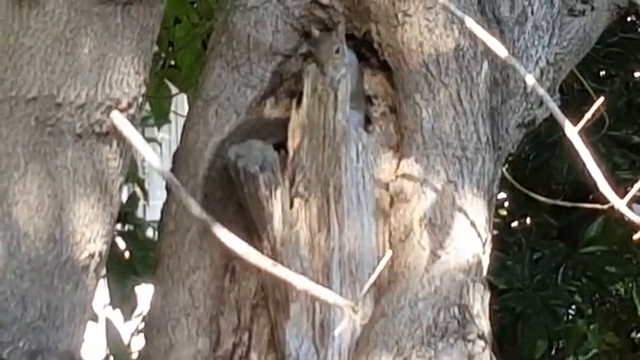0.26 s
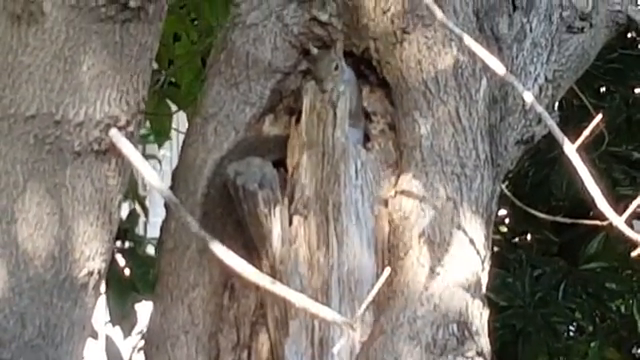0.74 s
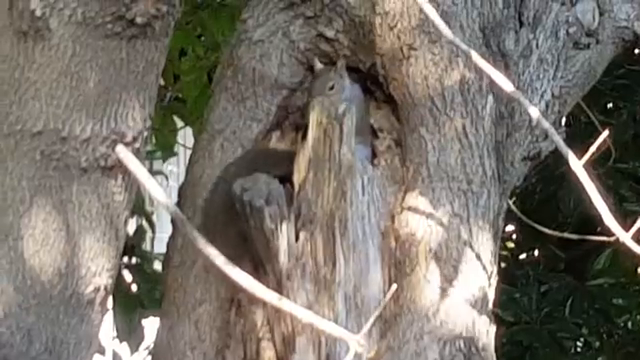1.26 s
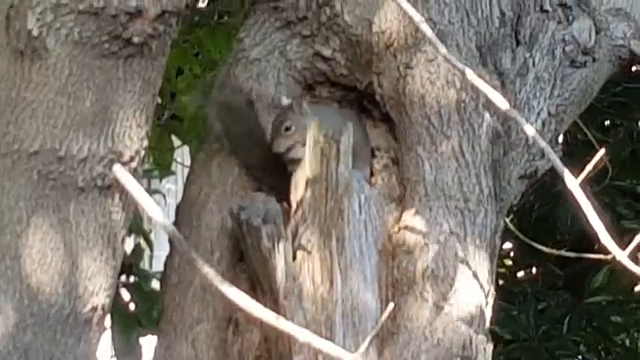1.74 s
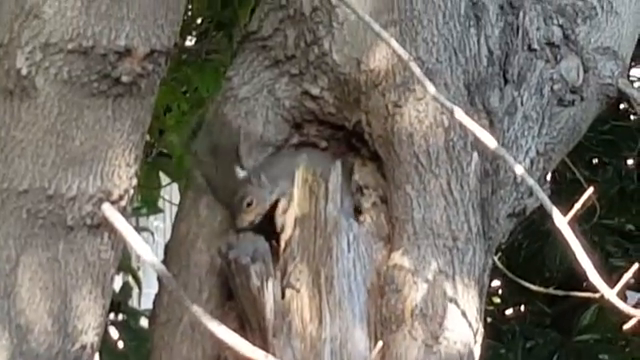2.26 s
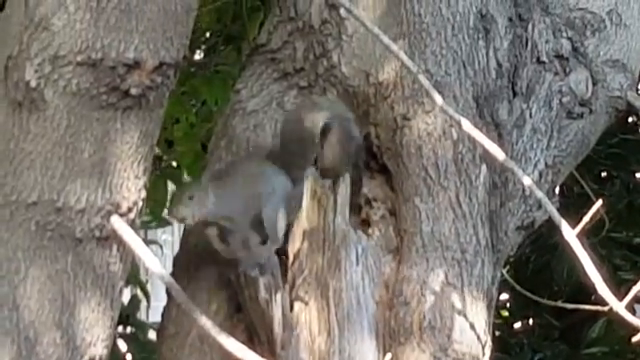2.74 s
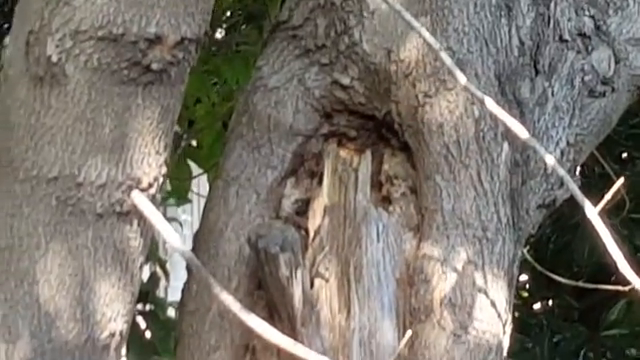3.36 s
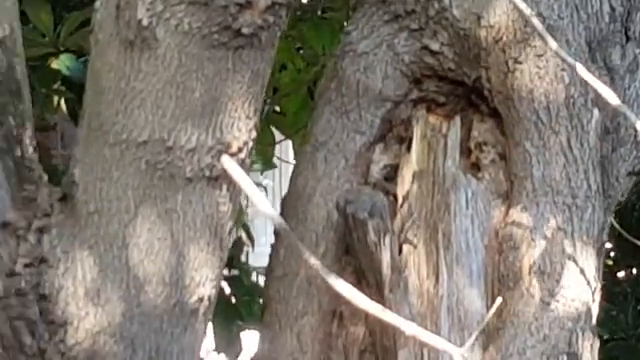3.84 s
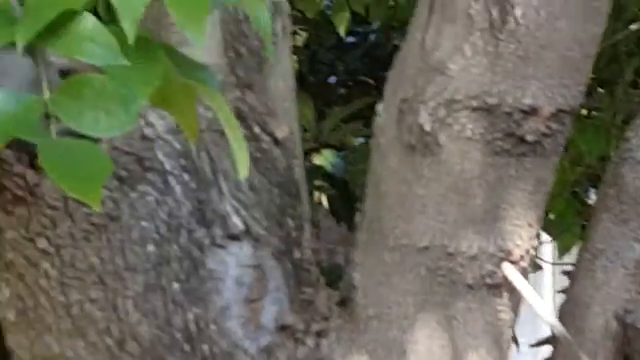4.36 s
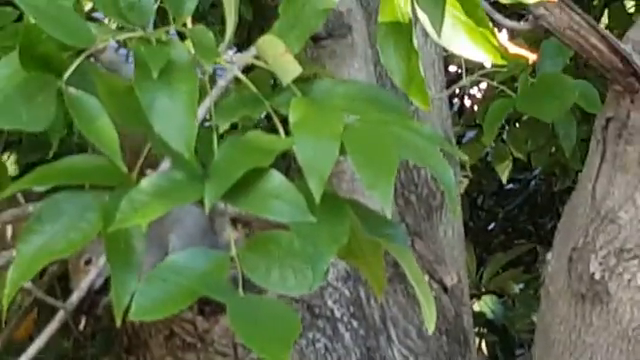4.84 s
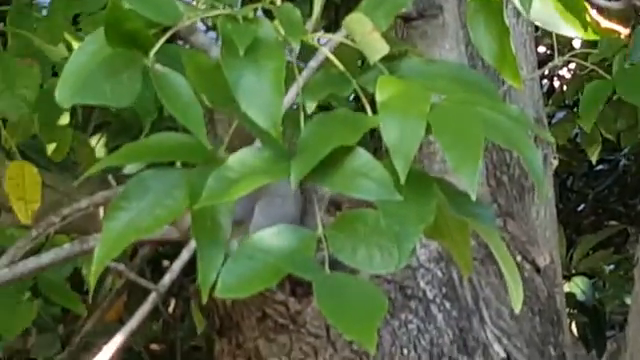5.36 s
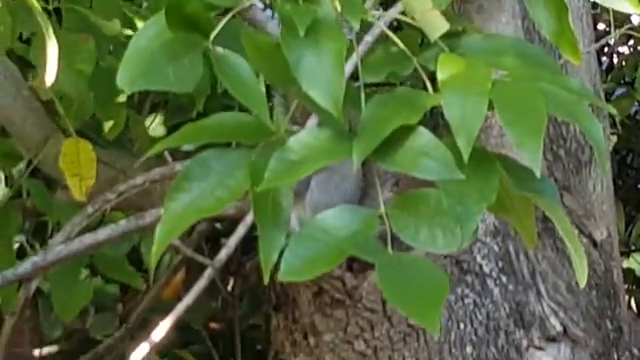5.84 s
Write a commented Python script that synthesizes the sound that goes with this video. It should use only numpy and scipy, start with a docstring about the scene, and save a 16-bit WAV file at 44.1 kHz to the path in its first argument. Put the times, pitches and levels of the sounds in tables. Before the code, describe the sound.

A hoarse squirrel repeats dry, scratchy barks, each under a tenth of a second or so, unevenly spaced at first, then more regular, with a tight cluster past the middle. Trunks and leaves scatter each bark into a short diffuse tail. Far below, town rumble, electric hum and a far engine that idles and later pulls away twice remain quiet, with a faint thin tone early on. Open-air stereo pickup.

```python
"""In the trees above a town, a squirrel gives a run of short hoarse barks.
Each bark is unsteady pulses and breath noise shaped by resonances of chest, mouth, throat and nose;
trunks and leaves, made as fading noise echoes, scatter it into a brief tail.
Behind it, sines make a far engine that idles away, then speeds up in two pulls, a brief thin tone
and a mains hum; bands of flickering noise make the rumble of the town."""
import sys
import numpy as np
from scipy import signal
from scipy.fft import rfft, irfft, next_fast_len
from scipy.io import wavfile
from scipy.ndimage import uniform_filter1d

SR = 44100
rng = np.random.default_rng(int(sys.argv[2]) if len(sys.argv) > 2 else 0)


def to_wav(sig):
    """Store sig (one row per channel, or 1-D mono) as 16-bit WAV at the path in sys.argv[1].

    Samples outside -1..1 are clipped; the rate is SR.
    """
    pcm = np.clip(np.atleast_2d(sig), -1, 1) * 32767
    pcm = np.round(pcm).astype(np.int16)
    wavfile.write(sys.argv[1], SR, pcm.T)  # frames by channels


N = 269284   # samples in the scene

# The barks, one per row; levels from chest to rasp, and the core, count from the whistle band:
# t/s, length/s, pitch f/Hz, roughness (1 or more = all breath), whistle band level/dB,
# chest level/dB, mouth f/Hz, throat level/dB, nose level/dB, upper resonances level/dB,
# rasp level/dB, mouth rise over the bark/dB, throat rise/dB, whistle core level/dB
BARK_ROWS = [(0.035, 0.043, 1004, 1.2, -56, 0.5, 1690, -3, -2, 1.5, -9, 0.5, 8, -11),
             (0.194, 0.047, 973, 0.9, -52.5, 2.5, 1800, -6, -5, 0, -11, -6, -4, -8),
             (0.509, 0.082, 870, 0.58, -52.5, 2.5, 1700, -5.5, -6, 1, -6.5, 3, -1.5, -8),
             (1.159, 0.11, 589, 0.42, -52.5, -2.5, 1790, -4, -2.5, 0.5, -4.5, 4, 2, -5.5),
             (1.537, 0.063, 836, 0.98, -51.5, 2.5, 1770, -4, -3, 3, -6.5, -2, -5, -11),
             (1.827, 0.069, 855, 0.94, -51.5, 3.5, 1770, -2.5, -4.5, 0.5, -2, -3, -5, -12),
             (2.158, 0.069, 812.5, 0.41, -53.5, 2.5, 1460, 0.5, -2.5, 1.5, -0.5, 1, -6, -9),
             (2.436, 0.057, 742.6, 0.46, -50, 0, 1320, -2, -4.5, -0.5, -2, -5, -4, -12),
             (2.698, 0.067, 1007, 1.14, -48, -4, 1310, -1.5, -6.5, -1, -6, 3, -9, -4),
             (3.223, 0.071, 773, 0.84, -56, 1, 1300, -1.5, -4, -1, -2.5, -4, 2, -10),
             (3.505, 0.072, 810.5, 0.29, -53, 1, 1680, 5.5, -1, 2, 3.5, 10, -15, -11),
             (3.739, 0.061, 777, 0.99, -51, 3, 1300, 0.5, -2.5, -1, -1, 3, -11, -10),
             (3.872, 0.054, 778, 1, -50.5, 4, 1430, 0, -4.5, -1, 1, 1, -2, -7),
             (4.036, 0.051, 787, 0.96, -51.5, 6.5, 1370, -3, -1.5, 2, 3.5, 0.5, -1.5, -12),
             (4.222, 0.062, 786, 0.93, -50.5, 4, 1510, -2.5, -5, 1, 0.5, 1, -9, -13),
             (4.420, 0.058, 818, 0.7, -51, 6.5, 1670, 0, -3, 1.5, 1, -6, -10, -13),
             (4.683, 0.07, 807, 0.85, -50, 5.5, 1630, -1.5, -3.5, 1.5, -1, 1, -5, -13),
             (5.045, 0.072, 819, 0.74, -49, 5, 1600, -8.5, -7, -0.5, -1, 11, -1.5, -10),
             (5.28, 0.054, 786, 0.77, -49.5, 3, 1690, -7, -1.5, 1, -1, 4, -1.5, -11),
             (5.495, 0.059, 791, 0.22, -49, 2.5, 1730, -8.5, -5, -2.5, -3.5, 10, -1.5, -12),
             (5.845, 0.057, 812, 1.06, -46, 0, 1720, -11, -7, -3, -10, 12, -6, -12)]
# How the voice changes as the head turns (a dip above 0 dB counts as none):
# t/s, chest f/Hz, mouth level against chest/dB, nose f/Hz, throat f/Hz, whistle band f/Hz,
# rasp f/Hz, lower dip f/Hz, its level/dB, upper dip f/Hz, its level/dB,
# top resonance level/dB, bridge resonance level/dB, left against right level/dB
HEAD_TURNS = [(0, 1090, -6, 2090, 3300, 7960, 12400, 4530, -6, 6000, -3, -8, -14, -1.5),
              (0.6, 1050, -3, 1990, 3300, 7700, 12300, 4650, -8, 5900, -8, -5, -18, -1),
              (1.2, 1090, 0, 2450, 3580, 7440, 11600, 4530, -6, 5900, -16, -14, -4, -1),
              (1.55, 1070, -1, 2600, 3300, 7800, 11300, 4540, -13, 5700, -12, -12, -12, -1.5),
              (1.85, 1010, -4, 2590, 3260, 7340, 11100, 4540, -7, 5800, -8, -13, -2, 0),
              (2.2, 1010, 3, 2200, 3080, 7400, 11200, 4500, -5, 5800, -8, -12, -14, -1),
              (2.45, 960, 2, 2200, 3070, 7540, 10900, 5100, -8, 5800, 4, -12, -24, -1),
              (2.7, 775, 2, 2760, 3170, 7270, 10600, 4700, -3, 5640, -4, -18, -22, -1.5),
              (3.5, 780, 1.5, 2120, 3230, 7180, 10600, 5100, 0, 5700, -0.5, -11, -24, -0.5),
              (4.0, 750, -7, 2190, 3150, 7140, 10550, 4840, 1, 5700, -7, -18, -18, -1),
              (4.7, 750, -3.5, 2480, 3260, 7350, 10700, 4700, -3, 5550, -6, -12, -17, -1),
              (5.15, 920, -10, 2470, 3400, 7300, 10700, 4770, -7, 5700, -8, -15, -18, 0),
              (5.5, 750, -8, 2330, 3400, 7770, 11400, 4800, 1, 5700, -1.5, -8, -23, -1.5),
              (6.1, 840, -9, 2360, 3200, 7300, 10600, 4800, 1, 5800, -10, -22, -18, 0.3)]
# Echoes from near trunks: level against the direct sound/dB, time to fall 60 dB/s
NEAR_TRUNKS = (6.5, .036)
# Echoes from far foliage, same columns
FAR_FOLIAGE = (1, 0.34)
# The far engine, one list per stretch: t/s, firing f/Hz, level/dB
ENGINE_STRETCHES = [
    [(0, 77.4, -49), (0.5, 82.2, -48.5), (0.9, 76, -48)],
    [(1.8, 101, -59), (2.5, 102, -46.5), (3.3, 102.6, -46), (4.0, 106.4, -44), (4.4, 113.7, -49.5),
     (4.75, 115.3, -50), (4.9, 126, -74)],
    [(4.4, 76.7, -81), (4.8, 79.8, -46.5), (5.2, 85, -45), (5.6, 92.4, -41.5), (6.1, 101, -47.5)],
]
# The brief thin tone: t/s, f/Hz, level/dB
THIN_TONE_ROWS = [(0.45, 399.5, -68), (0.55, 399.5, -59), (0.85, 399.5, -58), (0.92, 399.5, -53.5),
                  (1.2, 399.5, -52.5), (1.6, 399.5, -54), (1.66, 399.5, -75)]
# Colour of the town rumble: f/Hz, relative level per Hz/dB
TOWN_COLOUR = [(12, -67), (20, -53), (49, -15), (83, -10), (103, -6), (122, -7), (185, -12.5), (245, -13),
               (405, -16.5), (565, -25), (615, -23), (835, -20.5), (1100, -27.5), (1380, -29.5),
               (7130, -48.5), (15500, -58)]
# Loudness of the town rumble: t/s, level/dB
TOWN_LOUDNESS = [(0, -44), (2.4, -42.5), (3.6, -41.5), (5.3, -41), (6.1, -41.5)]
# How alike the rumble is at the two microphones: f/Hz, likeness (-1 opposite, 0 unrelated, 1 same)
TOWN_LIKENESS = [(60, 1), (130, 0.92), (290, 0.93), (640, 0.5), (1300, -0.19), (3000, 0.053),
                 (15000, 0.078)]
# Colour of the left microphone against the right: f/Hz, level/dB
MICROPHONE_COLOUR = [(300, 0.5), (800, 1), (1600, 1.5), (3000, 0.5), (5500, -1), (7500, 0.5), (9500, 3),
                     (11000, -0.5), (12500, -3.5), (15000, 0)]

# Resonances of the voice
LOW_WIDTH_HZ, MIDDLE_WIDTH_HZ, WHISTLE_WIDTH_HZ, RASP_WIDTH_HZ = 270, 310, 1960, 4100
CORE_WIDTH_HZ, DIP_WIDTH_HZ = 240, 550   # narrow core of the whistle band; dips cut by side cavities
BRIDGE_HZ, BRIDGE_WIDTH_HZ = 5210, 320   # narrow resonance between the two dips
UPPER, BETWEEN = (3990, 680, -4.5), (5170, 1330, -3.5)   # f/Hz, width/Hz, level/dB
TOP = (13340, 590)   # f/Hz, width/Hz
SKIRT_DB = 5   # broad skirt against the narrow peak of a resonance
MOUTH_DB_PER_KHZ = -8   # the mouth resonance weakens as it rises past 1500 Hz
SWELL_DB = 4   # rise of the treble over one bark
STEADY_S = .015   # a resonance holds its level over spans longer than this
GLIDE = .06   # resonances climb by this share of their pitch over one bark, as the mouth opens
# Echoes
FOLIAGE_DULL_HZ = 10000   # far foliage dulls its echoes above this
ECHOES_ALIKE_HZ = 800   # below this the echoes reach both microphones alike
EVEN_HZ, TREND_HZ = 140, 5000   # echoes favour no band wider than the first; the broad colour stays
LEAD = 256   # lead-in of the echo paths, in samples
# Background and microphones
HUM_HZ, HUM_DB = 120.74, -44.5
BAND_HZ, BAND_START_DB, BAND_DB_PER_S = 417, 2, -1   # a band of the rumble fades slowly
CUTOFF_HZ = 15800   # nearly silent from here up


def squirrel():
    """Every bark takes new paths through the trees, as the animal turns and moves."""
    out = np.zeros((2, N + SR))
    turn_s, *turns = np.transpose(HEAD_TURNS)
    for start_s, *voice in BARK_ROWS:
        *pose, pan_db = [np.interp(start_s, turn_s, column) for column in turns]
        one_bark = bark(*voice, *pose)
        heard = signal.fftconvolve(one_bark[None], trees())
        heard = heard * from_db([[pan_db / 2], [-pan_db / 2]])
        first = round(start_s * SR) - LEAD
        out[:, first:first + heard.shape[1]] += heard
    return out[:, :N]


def bark(length, pitch_hz, rough, db, chest_db, mouth_hz, throat_db, nose_db, upper_db, rasp_db,
         mouth_rise_db, throat_rise_db, core_db, chest_hz, mouth_db, nose_hz, throat_hz, whistle_hz,
         rasp_hz, low_dip_hz, low_dip_db, high_dip_hz, high_dip_db, top_db, bridge_db):
    """One bark: the lows burst out at once, the treble swells and arches later, all end quickly."""
    count = 8192
    t = np.arange(count) / SR
    progress = np.minimum(t / length, 1) - .5   # from -0.5 at the start to 0.5 at the end
    source = vocal_folds(count, pitch_hz, rough)
    clumps_db = 1.3 * drift(90, count=count)   # effort comes in clumps

    # chest and mouth
    mouth_db = chest_db + mouth_db + MOUTH_DB_PER_KHZ * (mouth_hz - 1500) / 1000
    mouth = formant(source, mouth_hz, LOW_WIDTH_HZ, mouth_db + mouth_rise_db * progress, progress)
    chest = formant(source, chest_hz, LOW_WIDTH_HZ, chest_db, progress)
    lows = chest - mouth

    # nose and throat
    throat_db = throat_db + throat_rise_db * progress
    throat = formant(source, throat_hz, MIDDLE_WIDTH_HZ, throat_db, progress)
    nose = formant(source, nose_hz, MIDDLE_WIDTH_HZ, nose_db - 0.9 * progress, progress)
    middle = nose - throat

    # upper resonances and the bridge
    upper = formant(source, *UPPER, progress) - formant(source, *BETWEEN, progress)
    upper = from_db(upper_db - 2.5 * progress) * upper
    bridge = from_db(bridge_db) * steady(resonate(source, BRIDGE_HZ, BRIDGE_WIDTH_HZ))

    # whistle band and rasp
    swell = from_db(SWELL_DB * progress)
    core = from_db(core_db) * steady(climbing(source, whistle_hz, CORE_WIDTH_HZ, progress))
    whistle = formant(source, whistle_hz, WHISTLE_WIDTH_HZ, 0, progress) * swell + core
    rasp = from_db(rasp_db) * steady(resonate(source, rasp_hz, RASP_WIDTH_HZ))
    rasp = rasp - formant(source, *TOP, top_db, progress)
    arch = from_db(4.0 * progress - 20.0 * progress ** 2)
    rasp = rasp * arch * swell

    burst = (1 - np.exp(-t / 0.002)) * (1 + 0.8 * np.exp(-t / 0.008))   # the folds are blown open
    opening = 1 - np.exp(-t / 0.004)
    ring_up = 1 - np.exp(-t / 0.0076)   # the throat rings up more slowly
    voice = burst * lows + ring_up * middle + opening * (upper + bridge + whistle - rasp)
    voice = dip(voice, low_dip_hz, low_dip_db)
    voice = dip(voice, high_dip_hz, high_dip_db)
    ending_db = -60 * np.maximum(t - length, 0) / .09   # 60 dB down in 0.09 s
    return from_db(db + clumps_db + ending_db) * voice


def vocal_folds(count, pitch_hz, rough):
    """Unsteady pulses, mixed with air noise that swells on every opening."""
    wobble = .045 * drift(120, count=count) + .03 * drift(25, count=count)
    cycles = np.cumsum(pitch_hz * (1 + wobble)) / SR
    clicks = np.diff(np.floor(cycles), prepend=0)   # one at each whole cycle
    pulses = clicks * from_db(0.53 * rng.standard_normal(count))
    air = rng.standard_normal(count) * (1 + np.cos(2 * np.pi * cycles))
    rough = np.clip(rough, 0, 1)
    return np.sqrt(1 - rough) * rms_one(pulses) + np.sqrt(rough) * rms_one(air)


def formant(source, hz, width_hz, db, progress):
    """A narrow climbing peak standing on a skirt three times as broad, its level held steady."""
    skirt = from_db(SKIRT_DB) * resonate(source, hz, 3 * width_hz)
    return from_db(db) * steady(climbing(source, hz, width_hz, progress) + skirt)


def climbing(source, hz, width_hz, progress):
    """A resonance that hands over from a lower pitch to a higher one."""
    low = resonate(source, hz * (1 - GLIDE / 2), width_hz)
    high = resonate(source, hz * (1 + GLIDE / 2), width_hz)
    return np.sqrt(.5 - progress) * low + np.sqrt(.5 + progress) * high


def resonate(x, hz, width_hz):
    """A resonance applied twice, so the valleys stay dark; rms 1."""
    r = np.exp(-np.pi * width_hz / SR)
    angle = 2 * np.pi * min(hz, .45 * SR) / SR
    for _ in range(2):
        x = signal.lfilter([1, 0, -1], [1, -2 * r * np.cos(angle), r * r], x)
    return rms_one(x)


def steady(x):
    """Even out slow chance swings of level to about rms 1."""
    power = uniform_filter1d(x ** 2, size=round(STEADY_S * SR))
    return x / np.sqrt(power + 1e-3)


def dip(x, hz, db):
    """A side cavity of the throat swallows a narrow band."""
    w, a = 2 * np.pi * hz / SR, np.tan(np.pi * DIP_WIDTH_HZ / SR)
    depth = a * from_db(min(db, 0))   # it never boosts
    return signal.lfilter([1 + depth, -2 * np.cos(w), 1 - depth], [1 + a, -2 * np.cos(w), 1 - a], x)


def trees():
    """Paths to the two microphones: direct sound, then dense fading echoes; mean energy 1."""
    t = np.arange(SR // 2) / SR
    near, far = [from_db(db - 60 * t / t60) / np.sqrt(t60 * SR / np.log(1e6))
                 for db, t60 in (NEAR_TRUNKS, FAR_FOLIAGE)]
    noise = rng.standard_normal((2, 2, len(t)))   # near or far, microphone, time
    # give the second microphone the lows of the first
    low_pass = signal.butter(2, ECHOES_ALIKE_HZ, fs=SR)
    noise[:, 1] += signal.lfilter(*low_pass, noise[:, 0] - noise[:, 1])
    dull = np.exp(-2 * np.pi * FOLIAGE_DULL_HZ / SR)
    foliage = signal.lfilter([np.sqrt(1 - dull ** 2)], [1, -dull], noise[1])
    paths = near * noise[0] + far * foliage
    paths[[0, 1], rng.integers(0, 6, size=2)] = 1   # the direct sound arrives a few samples apart
    paths = evened(paths)
    return paths / np.sqrt(np.mean(np.sum(paths ** 2, axis=1)))


def evened(paths):
    """Many small scatterers smear a sound in time but keep its broad colour; adds the lead-in."""
    count = paths.shape[1]
    spectrum = rfft(np.roll(paths, LEAD, axis=1))
    power = abs(spectrum) ** 2
    local = uniform_filter1d(power, size=round(EVEN_HZ * count / SR))
    trend = uniform_filter1d(power, size=round(TREND_HZ * count / SR))
    return irfft(spectrum * np.sqrt(trend / local), count)


def far_engine():
    """The beat of the firing, heard from afar as one wavering sine per stretch."""
    return sum(tone(stretch, waver_db=1.2) for stretch in ENGINE_STRETCHES)


def thin_tone():
    """A brief thin tone: one sine at a fixed pitch, its level wavering a little."""
    return tone(THIN_TONE_ROWS, waver_db=.4)


def mains_hum():
    """A low electric hum: one sine throughout, almost steady."""
    return tone([(0, HUM_HZ, HUM_DB), (N / SR, HUM_HZ, HUM_DB)], waver_db=.3)


def tone(rows, waver_db):
    """A sine along (t/s, f/Hz, level/dB) rows, at -120 dB outside them, its level wavering."""
    s, hz, db = np.transpose(rows)
    t = np.arange(N) / SR
    gain = from_db(np.interp(t, s, db, left=-120, right=-120) + waver_db * drift(1.3))
    cycles = np.cumsum(np.interp(t, s, hz)) / SR + rng.random()
    return np.sqrt(2) * gain * np.sin(2 * np.pi * cycles)


def town():
    """Third-octave bands of stereo noise, each with its own level, flicker and likeness."""
    t = np.arange(N) / SR
    out = 0
    edges = 20 * 2 ** (np.arange(30) / 3)
    settle = SR // 2   # let the filters settle first
    white = rng.standard_normal((2, 2, N + settle))   # neighbouring bands use different noise
    for k, (low, high) in enumerate(zip(edges, edges[1:])):
        band_pass = signal.butter(2, [low, high], "band", fs=SR, output="sos")
        mid, side = signal.sosfilt(band_pass, white[k % 2])[:, settle:]
        hz = np.sqrt(low * high)
        alike = np.clip(at_hz(TOWN_LIKENESS, hz), -1, 1)
        nearness = np.exp(-(np.log2(hz / BAND_HZ) / .5) ** 2)   # to the fading band
        fading_db = nearness * (BAND_START_DB + BAND_DB_PER_S * t)
        gain = from_db(at_hz(TOWN_COLOUR, hz) + fading_db + 1.45 * drift(14.3))
        out = out + gain * (np.sqrt(1 + alike) * mid + np.sqrt(1 - alike) * side * [[1], [-1]])
    return rms_one(out) * from_db(np.interp(t, *np.transpose(TOWN_LOUDNESS)))


def drift(rate, count=N):
    """Slow chance: coarse noise through a double one-pole low-pass; spread 1."""
    step = 20   # samples between coarse points
    r = np.exp(-2 * np.pi * rate * step / SR)
    noise = rng.standard_normal(count // step + 4002)
    slow = signal.lfilter([1], [1, -2 * r, r * r], noise)[4000:]
    return np.interp(np.arange(count) / step, np.arange(len(slow)), slow / np.std(slow))


def from_db(db):
    """Decibels to gain."""
    return 10 ** (np.asarray(db) / 20)


def rms_one(x):
    """Scale to rms 1."""
    return x / np.sqrt(np.mean(x ** 2) + 1e-20)


def at_hz(points, hz):
    """Read a spectrum on a log-frequency axis."""
    points = np.array(points)
    return np.interp(np.log(hz), np.log(points[:, 0]), points[:, 1])


def scene():
    """Barks over rumble; the low tones reach both microphones alike."""
    return squirrel() + far_engine() + thin_tone() + mains_hum() + town()


def record(dry):
    """The two microphones differ in colour; the top is cut steeply."""
    size = next_fast_len(N + 4096)
    hz = np.arange(size // 2 + 1) * SR / size + 1   # 1 Hz up, to avoid log of 0
    tilt_db = at_hz(MICROPHONE_COLOUR, hz) / 2
    pair = irfft(rfft(dry, size) * from_db([tilt_db, -tilt_db]), size)[:, :N]
    top_cut = signal.cheby2(20, 60, CUTOFF_HZ, fs=SR, output="sos")
    return signal.sosfilt(top_cut, pair)


dry = scene()
out = record(dry)
to_wav(out)
```